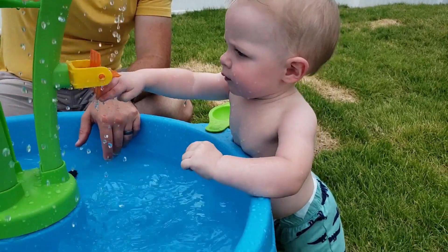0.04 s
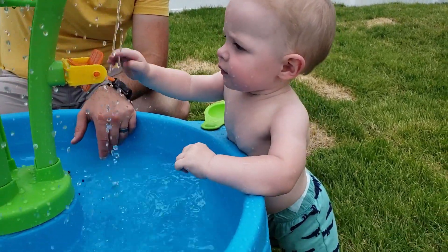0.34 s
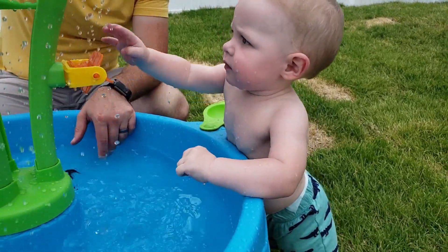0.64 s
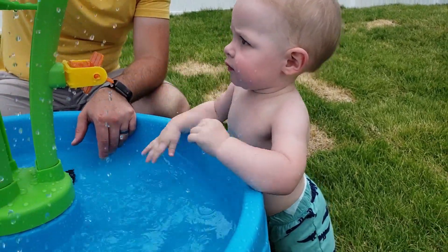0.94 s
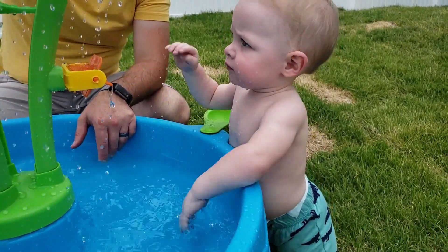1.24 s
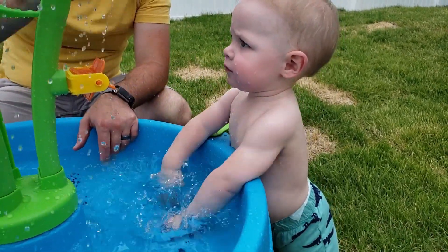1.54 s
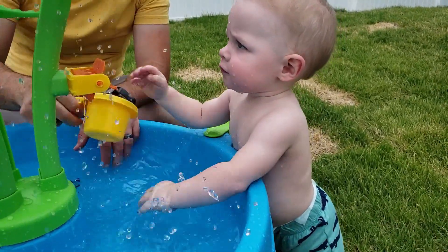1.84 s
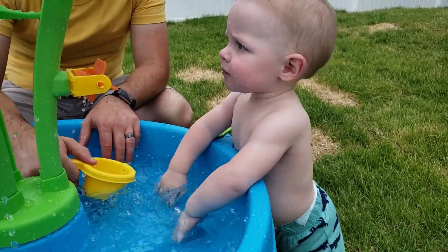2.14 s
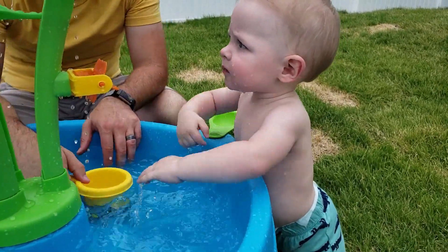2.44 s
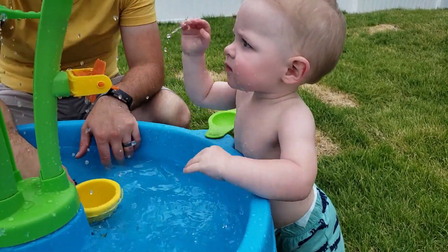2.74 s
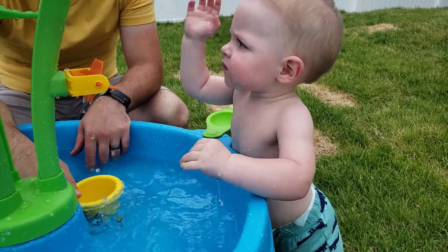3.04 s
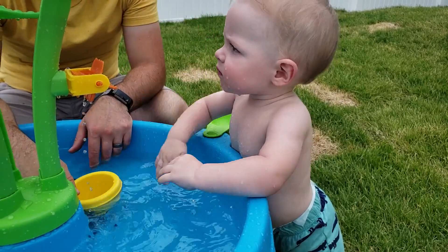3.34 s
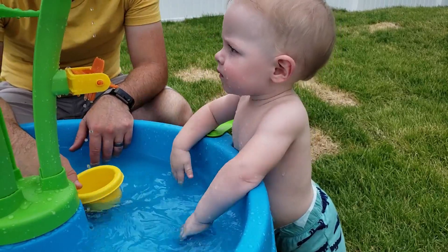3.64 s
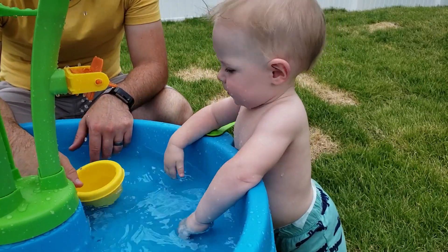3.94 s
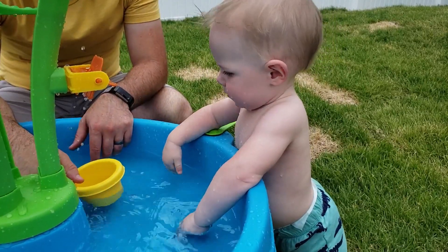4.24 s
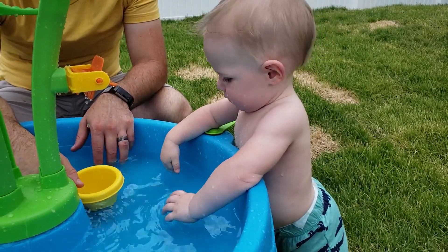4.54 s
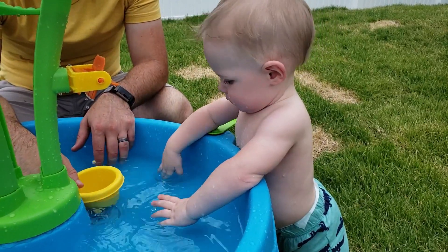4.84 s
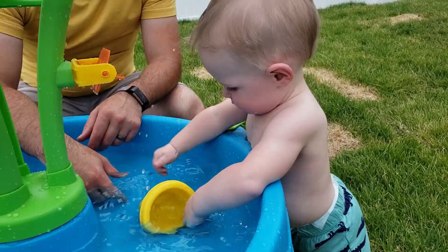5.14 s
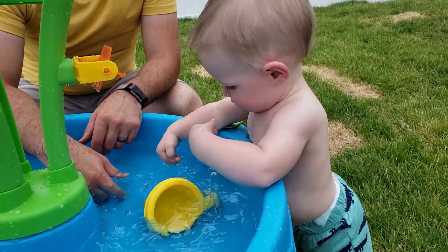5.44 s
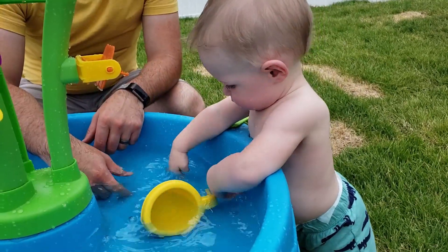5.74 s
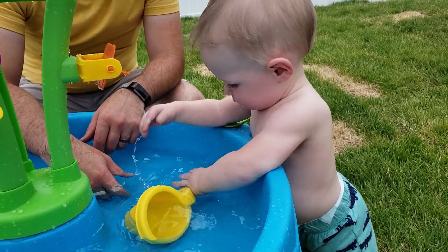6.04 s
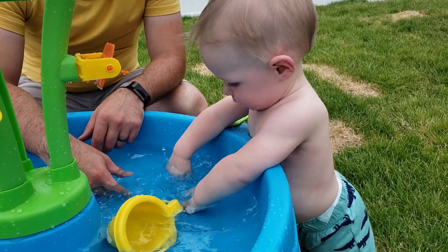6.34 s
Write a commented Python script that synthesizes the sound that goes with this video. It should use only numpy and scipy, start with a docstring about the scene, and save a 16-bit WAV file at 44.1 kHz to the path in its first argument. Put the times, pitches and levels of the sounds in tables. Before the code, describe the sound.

Water trickles and sloshes close by in a plastic play table outdoors as small hands stir and scoop it, with ticking drops and small plinking bubbles. From the start, gusts of wind rumble and thump on the microphone over a faint garden hush. Between about 1.5 and 2.2 seconds come the loudest hand slaps, with spray pattering back and one hard plastic clack at 1.8 seconds. The wind drops away around 2.8 seconds, leaving drips and bubbles, and returns at 3.2, when a very faint, distant whistle, perhaps a bird, is just audible. Another slap lands at 3.5 seconds, followed by a light, hollow knock of a floating cup against the tub. Just after 5 seconds the sound cuts out for an instant and returns with a click. The water then quiets to a few small splashes, with soft cup knocks near 5.3, 5.8 and 6.4 seconds.

```python
"""Small hands slap and scoop the water in a plastic water table outdoors.
Spray patters back, drops tick, and trapped air bubbles ring with a rising plink.
Plastic clacks once and a floating cup knocks on the tub, whose walls add quick echoes.
Gusts of wind buffet the left and right microphones, over a faint garden hush and one far whistle.
Late on, the sound cuts out for a moment and comes back with a click."""
import sys
import numpy as np
from scipy import signal
from scipy.fft import rfft, irfft
from scipy.io import wavfile
from scipy.ndimage import uniform_filter1d

SR = 44100
rng = np.random.default_rng(int(sys.argv[2]) if len(sys.argv) > 2 else 0)


def put_to_file(sound):
    """Save the sound as 16-bit audio at rate SR, in the file named by the first command-line argument."""
    columns = np.atleast_2d(sound).T  # one column per channel
    safe = np.clip(columns, -1, 1)
    whole_steps = np.round(safe * 32767)
    wavfile.write(sys.argv[1], SR, whole_steps.astype(np.int16))


N = 281799
TIME = np.arange(N) / SR


def gain_of(db):
    """Turns decibels into a factor to multiply by."""
    return 10 ** (np.asarray(db) / 20)


def summed(levels_db):
    """The level in dB of several unrelated sounds together."""
    return 10 * np.log10(sum(gain_of(db) ** 2 for db in levels_db))


def evened(x):
    """Scales a sound to an average strength (rms) of 1."""
    return x / np.sqrt(np.mean(x ** 2) + 1e-20)


def steadied(x, seconds):
    """Holds the strength near 1 over spans of this length, leaving faster detail."""
    size = max(int(seconds * SR), 8)
    power = uniform_filter1d(uniform_filter1d((x ** 2).mean(0), size), size)
    return x / np.sqrt(abs(power) + 1e-12)


def at_frequency(points, hz):
    """Looks up values between the rows of a frequency table."""
    row_hz, value = np.transpose(points)
    return np.interp(np.log(hz + 1), np.log(row_hz + 1), value)


def curves(rows):
    """Joins the rows of a time table with straight lines, one curve per column."""
    times, *columns = np.transpose(rows)
    return [np.interp(TIME, times, column) for column in columns]


def swell(start, length, attack_s, release_s):
    """A level in dB that rises, holds and falls."""
    ramps = np.minimum((TIME - start) / attack_s, (start + length - TIME) / release_s)
    return 20 * np.log10(np.clip(ramps, 1e-6, 1))


def wander(rate_hz):
    """A smooth random wobble of strength 1; a higher rate wobbles faster."""
    hz = np.fft.rfftfreq(N, 1 / SR)
    return evened(irfft(rfft(rng.standard_normal(N)) * np.exp(-(hz / rate_hz) ** 2), N))


def panned(sound, pan_db):
    """Makes the left side pan_db louder than the right."""
    return sound * gain_of(np.array([[pan_db], [-pan_db]]) / 2)


def add(mix, start, sound):
    """Mixes a sound in at a start time in seconds."""
    part = mix[:, max(round(start * SR), 0):][:, :sound.shape[-1]]
    part += sound[..., :part.shape[1]]


def coloured(x, tone, size=8192):
    """Filters a sound to follow a tone table; white noise keeps its overall strength."""
    log_gain = np.log(gain_of(at_frequency(tone, abs(np.fft.fftfreq(size, 1 / SR)))))
    taps = np.fft.ifft(np.exp(np.conj(signal.hilbert(log_gain)))).real[:size // 2]
    return signal.oaconvolve(x, taps[None] / np.linalg.norm(taps), axes=1)[:, :x.shape[1]]


def ring(hz, ring_s, rise=0., size=6000):
    """A pure note that fades 60 dB in ring_s while its pitch climbs by the fraction rise."""
    age = np.arange(size) / SR / max(ring_s, 1 / 1000)
    turns = np.cumsum(hz * (1 + rise * np.minimum(age, 1))) / SR
    return np.sin(2 * np.pi * turns) * np.exp(-np.log(1000) * age)


def bubble_swarm(per_s, low_hz, high_hz, cycles, spread_db, width_db, scatter, size):
    """Many tiny bubbles ring, each with its own pitch, strength and place in the tub."""
    count = int(per_s * N / SR)
    when, pitch, strength, life, side, path = rng.random((count, 6)).T[:, :, None]
    hz = low_hz * (high_hz / low_hz) ** pitch
    turns = hz * np.arange(size) / SR
    age = turns / (cycles * (.5 + life))
    strength_db = spread_db * np.minimum(-np.log(strength), 4)
    envelope = gain_of(strength_db) * hz * np.exp(-np.log(1000) * age) * (1 - np.exp(-2 * turns))
    phase = 2 * np.pi * turns * (1 + 0.05 * np.minimum(age, 1))  # the pitch climbs as a bubble rises
    samples = ((when * N).astype(int) + np.arange(size)).ravel()
    channels = []
    for sign in 1, -1:  # left, right
        notes = envelope * gain_of(sign * width_db * (side - .5))
        notes *= np.sin(phase + sign * scatter * (path - .5))
        channels.append(np.bincount(samples, notes.ravel(), N)[:N])
    return evened(np.array(channels))


# Trickling and stirring in the tub: (time [s], spray level [dB], slosh level [dB])
STIRRING = [(0.0, -52, -52.5), (0.34, -50, -56), (0.5, -42.5, -50.5), (0.75, -44, -54.5),
            (0.99, -44.5, -49), (1.16, -45, -43), (1.37, -45, -51.5), (1.56, -51.5, -45),
            (1.71, -44, -44.5), (2.26, -42.5, -42.5), (2.6, -47, -48.5), (3.38, -46, -50),
            (3.58, -50.5, -46.5), (4.09, -50, -52), (4.72, -52.5, -58), (5.09, -55.5, -53),
            (5.41, -68, -69), (6.39, -70, -76)]
# Hands scooping the water: (start [s], length [s], spray level [dB], slosh level [dB])
HAND_SCOOPS = [(0.308, 0.14, -46.5, -53), (1.074, 0.16, -66, -70), (1.526, 0.15, -37.5, -43),
               (1.73, 0.061, -34, -45), (2, 0.21, -44, -47), (2.179, .26, -53.5, -45),
               (2.805, 0.114, -49.5, -43.5), (3.436, 0.094, -43, -48), (3.55, 0.12, -45, -52),
               (3.759, 0.082, -46, -54.5), (3.891, 0.12, -47.5, -48), (4.08, 0.084, -54, -51),
               (4.802, 0.082, -67, -52), (5.229, 0.071, -60, -51.5), (6.271, 0.11, -46.5, -58)]
# The bright tone of spray: (frequency [Hz], level [dB])
SPRAY_TONE = [(1200, -16.5), (2400, -9.5), (3100, -6.5), (3700, -5), (4500, -2), (6200, -1), (8200, -8.5),
              (10000, -7), (12000, -3.5), (13500, -9), (16000, -9.5)]
# The lower tone of sloshing: (frequency [Hz], level [dB])
SLOSH_TONE = [(300, -2.5), (650, -5), (950, 4), (1300, -1), (1650, 1), (2000, -4), (2400, 0.5), (3100, -11),
              (5000, -8.5)]


def water():
    """Fine spray and larger, lower bubbles in a soft wash, louder with each stir, scoop and slap."""
    stir_spray_db, stir_slosh_db = curves(STIRRING)
    spray_levels = [stir_spray_db + wander(22.3)]  # spray lands in clusters
    slosh_levels = [stir_slosh_db + 1.16 * wander(16.4)]  # little waves swell and sink
    for start, length, spray_db, slosh_db in HAND_SCOOPS:
        swell_db = swell(start, length, attack_s=0.016, release_s=0.015)
        spray_levels.append(spray_db + swell_db)
        slosh_levels.append(slosh_db + swell_db)
    for falling_db in falling_water_levels():
        spray_levels.append(falling_db)
        slosh_levels.append(falling_db - 3.5)
    hiss = rng.standard_normal(N) + 0.48 * rng.standard_normal((2, N))
    mist = evened(hiss * gain_of(2 * wander(83)))
    droplets = bubble_swarm(per_s=2200, low_hz=2390, high_hz=12940, cycles=21,
                            spread_db=6.5, width_db=4.5, scatter=0.92, size=400)
    froth = bubble_swarm(per_s=1000, low_hz=489, high_hz=3415, cycles=27.3,
                         spread_db=2.5, width_db=5.5, scatter=1.7, size=1000)
    spray = steadied(coloured(droplets + gain_of(-4.5) * mist, SPRAY_TONE), 0.053)
    slosh = steadied(coloured(froth + gain_of(-2) * mist, SLOSH_TONE), 0.04)
    return gain_of(summed(spray_levels) - 0.78) * spray + gain_of(summed(slosh_levels)) * slosh


# How far the left microphone is ahead for sound from one side: (frequency [Hz], lead [radians])
LEFT_LEAD = [(200, 0.23), (700, 1.03), (1200, 2.4), (1600, 3.1), (2250, 5.36), (2850, 7.5), (4200, 7.8),
             (4600, 6.8), (8000, 5.9)]


def tub(sound, echo_db, off_centre, echo_s=0.035, heave_hz=1.3, size=3000):
    """Sound reaches the microphones directly and off the tub walls; echoes shift as the water heaves."""
    t = np.arange(size) / SR
    heave = 2 * np.pi * heave_hz * TIME
    echoes = np.zeros((2, N))
    for weight in np.cos(heave), np.sin(heave):
        bounces = rng.standard_normal((2, size)) * (t > .001) * gain_of(-60 * t / echo_s)
        echoes += signal.oaconvolve(sound * weight, bounces / np.linalg.norm(bounces[0]), axes=1)[:, :N]
    lead = off_centre * at_frequency(LEFT_LEAD, np.fft.rfftfreq(N, 1 / SR))
    direct = irfft(rfft(sound) * np.exp(.5j * np.array([lead, -lead])), N)
    return panned(direct + gain_of(echo_db) * echoes, 1.6)


# The tone of the quiet garden: (frequency [Hz], level [dB])
GARDEN_TONE = [(30, -8.5), (150, -6), (400, -4), (650, -24), (900, -6), (1300, -18), (1750, -19),
               (3200, -41), (5500, -25), (9000, -27), (16000, -27)]


def garden_hush():
    """The faint steady hush of the garden."""
    return gain_of(-56.5) * evened(coloured(rng.standard_normal((2, N)), GARDEN_TONE))


def turbulence(tone, lump_hz, shared, steady_s, lump_db=4):
    """Swirling air makes lumpy noise, partly shared by the two microphones."""
    own, common = rng.standard_normal((2, N)), rng.standard_normal(N)
    lumps = gain_of(lump_db * (wander(lump_hz) + np.array([wander(lump_hz), wander(lump_hz)])))
    noise = np.sqrt(1 - shared) * own + np.sqrt(shared) * common
    return steadied(coloured(noise * lumps, tone), steady_s)


# The breeze between gusts: (time [s], rumble level [dB])
BREEZE_LEVELS = [(0, -29.5), (.27, -36), (.6, -30.5), (1.3, -33), (2.05, -31), (2.55, -34.5), (2.88, -64.5),
                 (3.11, -61), (3.2, -45), (3.55, -38.5), (3.8, -41.5), (4.05, -35), (4.4, -35.5),
                 (4.95, -29), (5.5, -45.5), (5.85, -28), (6.27, -56.5), (6.39, -40)]
# Gusts on the microphones: (start [s], length [s], rumble level [dB], flutter level [dB])
WIND_GUSTS = [(0.105, 0.069, -28.5, -38.5), (0.317, 0.22, -28, -31.5), (0.479, 0.14, -23, -25.5),
              (0.654, 0.13, -28.5, -30.5), (0.784, 0.076, -35, -26), (0.927, .11, -25, -36),
              (1.043, 0.18, -25.5, -27), (1.348, 0.068, -22.5, -28), (1.409, 0.13, -28.5, -28),
              (1.658, 0.31, -27.5, -39), (2.103, 0.12, -28, -32.5), (2.286, 0.083, -33, -28.5),
              (2.399, .2, -32, -38), (3.287, 0.12, -33.5, -32), (3.896, 0.099, -29, -33.5),
              (4.067, .11, -27, -33.5), (4.55, 0.258, -28.5, -34.5), (4.837, 0.22, -37, -30),
              (5.098, 0.258, -28.5, -40.5), (5.593, 0.13, -32, -42.5), (5.712, 0.095, -28.5, -33.5),
              (6.112, 0.12, -35.5, -71)]
# The wind's deep rumble: (frequency [Hz], level [dB])
RUMBLE_TONE = [(12, -9), (28, -7), (50, -1), (75, 1.5), (130, -3.5), (220, -11), (400, -28), (900, -55.5),
               (2500, -61)]
# Its higher flutter: (frequency [Hz], level [dB])
FLUTTER_TONE = [(60, -27.5), (180, -2.5), (300, 1.5), (450, -5), (700, -18), (1100, -36.5), (2000, -47.5),
                (5000, -58)]
# Its crackle, higher still: (frequency [Hz], level [dB])
CRACKLE_TONE = [(200, -16.5), (550, 7), (850, 2.5), (1300, -8), (2200, -27), (5000, -35)]


def wind():
    """A low rumble; stronger gusts shed smaller swirls that flutter, and the strongest crackle."""
    breeze_db = curves(BREEZE_LEVELS)[0] + 0.5 * wander(18)
    ragged_db = 2 * wander(28.2)  # a gust comes as a string of thumps
    rumble_levels = [breeze_db]
    flutter_levels = [breeze_db - 12 - 0.18 * (breeze_db - breeze_db.mean())]  # softer and steadier
    for start, length, gust_rumble_db, gust_flutter_db in WIND_GUSTS:
        swell_db = swell(start, length, attack_s=0.017, release_s=0.031)
        rumble_levels.append(gust_rumble_db + swell_db)
        flutter_levels.append(gust_flutter_db + swell_db)
    flutter_db = summed(flutter_levels) + ragged_db
    rumble = turbulence(RUMBLE_TONE, lump_hz=34.8, shared=0.13, steady_s=0.046)
    flutter = turbulence(FLUTTER_TONE, lump_hz=79.5, shared=0.11, steady_s=0.053)
    crackle = turbulence(CRACKLE_TONE, lump_hz=120, shared=0.1, steady_s=0.05)
    return (gain_of(summed(rumble_levels) + 4) * rumble
            + gain_of(flutter_db + 1.5) * flutter
            + gain_of(1.425 * flutter_db - 8.5) * crackle)


def strays(level_db, per_s, low_hz, high_hz, spread_db=7.5, width_db=9.5):
    """Random events along a level curve: (time [s], level [dB], pitch [Hz], left over right [dB])."""
    when, strength, pitch, side = rng.random((int(per_s * N / SR), 4)).T
    times = when * N / SR
    db = np.interp(times, TIME, level_db) + spread_db * (strength - .5)
    hz = low_hz * (high_hz / low_hz) ** pitch
    return list(zip(times, db, hz, width_db * (side - .5)))


# The largest drops landing: (time [s], level [dB], pitch [Hz], left over right [dB])
BIG_DROPS = [(0.03, -22, 4770, 0.5), (0.116, -25, 5070, 1.5), (0.5576, -23.5, 4130, -1),
             (0.85, -20, 4200, -1), (1.266, -23, 5930, -3), (1.367, -29.5, 6000, 0),
             (2.0607, -15, 5430, -2), (2.782, -23, 4640, 2), (2.9116, -24, 4800, -2),
             (2.949, -23, 5950, -1), (3.0963, -25.5, 4200, 2), (3.175, -26, 5900, 2),
             (3.2625, -23.5, 7700, 4), (3.5926, -21.5, 3470, -2), (3.6493, -24, 4050, 1),
             (3.847, -24, 6370, 1), (3.9395, -30, 6150, -3), (4.132, -22, 5150, 0), (4.3093, -28, 7260, 3),
             (4.387, -21.5, 5200, 0), (4.7376, -26, 6750, 1), (5.786, -30, 4940, -2)]


def drops():
    """A drop ticks on the surface and rings a tiny bubble; smaller drops fall at random."""
    out, t = np.zeros((2, N)), np.arange(1500) / SR
    spray_db, _ = curves(STIRRING)
    small_drops = strays(spray_db + 14, per_s=7, low_hz=3720, high_hz=7650)
    for start, db, hz, pan_db in BIG_DROPS + small_drops:
        tick = coloured(rng.standard_normal((1, len(t))) * np.exp(-t / 0.0031), SPRAY_TONE)[0]
        plink = ring(hz, ring_s=0.013, rise=0.092, size=len(t))
        add(out, start, panned(gain_of(db - 10) * tick + gain_of(db - 6) * plink, pan_db))
    return out


# Strong swirls of air hitting a microphone: (time [s], level [dB], pitch [Hz], left over right [dB])
AIR_SWIRLS = [(0.351, -13, 191, 6), (0.569, -10.5, 187, 7), (0.584, -14, 51.3, -3), (0.699, -13.5, 129, 0),
              (0.804, -13.5, 167, 1), (1.06, -14.5, 163, 0), (1.094, -10, 347, 0), (1.154, -12, 300, 6),
              (1.364, -6.5, 96, 3), (1.476, -11.5, 218, 3.5), (1.9, -11, 78.5, -1.5), (2.292, -18, 230, -3),
              (3.314, -15.5, 112, 7), (3.36, -12, 71.5, -2), (3.669, -22, 74, 12), (4.239, -19.5, 182, 4.5),
              (4.384, -23, 92, 1), (4.627, -13.5, 157, 9), (4.694, -11, 61, 8), (4.777, -15.5, 59.7, 4),
              (4.884, -9.5, 330, 3), (4.968, -15, 130, -2), (5.014, -9, 274, -5), (5.101, -9.5, 61.4, -2),
              (5.132, -17.5, 353, -8.5), (5.149, -9, 63, 4.5), (5.215, -9.5, 160.5, -0.5),
              (5.326, -13, 56.5, 0.5)]


def wind_thumps():
    """Each swirl is one swing of pressure, reaching each side at its own moment, plus a puff."""
    out, t = np.zeros((2, N)), np.arange(3000) / SR
    delays = rng.uniform(0, 0.002, (len(AIR_SWIRLS), 2))
    for (start, db, hz, pan_db), delay in zip(AIR_SWIRLS, delays):
        turns = hz * np.maximum(t - delay[:, None], 0)
        swing = np.sin(2 * np.pi * turns) * turns * np.exp(-(turns / 0.79) ** 2)
        quick_db = 3.5 * np.log2(hz / 160)  # small, quick swirls break into a stronger puff
        burst = rng.standard_normal((2, len(t))) * t * np.exp(-t / 0.003)
        crackle = gain_of(quick_db - 6) * coloured(burst[::-1], CRACKLE_TONE)
        puff = coloured(burst, FLUTTER_TONE) + crackle
        thump = gain_of(db - 1.5) * swing / abs(swing).max()
        thump += gain_of(db - 7 + quick_db) * puff / abs(puff).max()
        add(out, start, panned(thump, pan_db))
    return out


# The largest trapped bubbles: (time [s], level [dB], rough pitch [Hz])
BIG_BUBBLES = [(0.373, -32.5, 1610), (0.971, -30, 1046), (1.129, -33.5, 3350), (1.203, -30, 1110),
               (1.296, -23, 1030), (1.63, -29, 854), (1.946, -24, 2460), (2.031, -29, 940),
               (2.132, -37, 1040), (2.201, -26, 1120), (2.237, -28, 2440), (2.801, -29.5, 786),
               (2.816, -36, 395), (2.879, -33.5, 2030), (2.896, -39, 677), (3.048, -28.5, 2395),
               (3.49, -24, 2290), (3.709, -33, 990), (3.791, -32, 2300), (3.965, -27, 2400),
               (4.099, -33, 990), (4.236, -35.5, 1020), (4.434, -36, 2480), (4.506, -33.5, 2520),
               (4.558, -35, 2250), (4.812, -36, 2490), (6.039, -43, 2340)]


def bubbles():
    """A drop punches in with a splat; the trapped air rings, rising in pitch as it nears the surface."""
    out, t = np.zeros((2, N)), np.arange(6000) / SR
    _, slosh_db = curves(STIRRING)
    small_bubbles = strays(slosh_db + 11, per_s=9, low_hz=825, high_hz=2730)
    centred_bubbles = [(*row, 0) for row in BIG_BUBBLES]
    for start, db, hz, pan_db in centred_bubbles + small_bubbles:
        plop = ring(hz * .97, ring_s=47 / hz, rise=0.25)  # large, low bubbles ring longer
        plop *= 1 - np.exp(-t / 0.00026)
        splat = coloured(rng.standard_normal((1, len(t))) * np.exp(-t / 0.00073), SLOSH_TONE)[0]
        add(out, start, panned(gain_of(db + 3) * (plop + .3 * splat), pan_db))
    return out


# Hands slapping the water: (time [s], level [dB], brightness [dB per octave])
HAND_SLAPS = [(1.5508, -10, -0.5), (1.6087, -2, 1), (1.6631, -24, -8), (1.733, -17.5, -2), (1.7503, -7, 1),
              (2.1025, -5, 2), (2.1254, -6, -3), (2.2339, -17.5, -4), (3.474, -12, 2), (4.8063, -24, -4),
              (5.256, -18.5, -3.5), (5.307, -25, -4), (5.7555, -20.5, 4), (6.2892, -28, 0)]


def slaps(fade_s=0.054):
    """A palm bursts the surface: a crackling sheet of spray over a lower splat, both dying quickly."""
    out, t = np.zeros((2, N)), np.arange(8000) / SR
    for start, db, brightness in HAND_SLAPS:
        noise = rng.standard_normal(len(t)) + .5 * rng.standard_normal((2, len(t)))
        clumps = gain_of(3 * evened(uniform_filter1d(rng.standard_normal(len(t)), 50)))
        envelope = gain_of(db - 13 - 60 * t / fade_s) * (1 - np.exp(-t / 0.00096))
        burst = envelope * steadied(clumps * noise, 0.0015)
        sheet_tone = [(hz, level + brightness * np.log2(hz)) for hz, level in SPRAY_TONE]
        splat = gain_of(0.1 * db - 17) * coloured(burst, SLOSH_TONE)
        add(out, start, coloured(burst, sheet_tone) + splat)
    return out


def falling_water_levels(fade_s=0.29):
    """The water thrown up by a slap falls back: one fading curve in dB for each slap."""
    return [np.where(TIME > start, db - 28 - 60 * (TIME - start) / fade_s, -np.inf)
            for start, db, _ in HAND_SLAPS]


# The notes that ring together in dry plastic: (pitch [Hz], level [dB], ring time [s])
CLACK_NOTES = [(1776, -9, 0.014), (2400, -4.5, 0.034), (2770, -10, 0.019), (3300, -6, 0.026),
               (4720, -17, 0.015), (5640, -6.5, 0.0077), (6120, -5.5, 0.015), (7370, -7.5, 0.013)]


def plastic_clack(start=1.757, level_db=-5.5):
    """One hard hit on dry plastic: short, high notes and a burst of contact noise."""
    out, t = np.zeros((2, N)), np.arange(6000) / SR
    notes = sum(gain_of(db) * ring(hz, ring_s) * (-1) ** k  # every other note starts downward
                for k, (hz, db, ring_s) in enumerate(CLACK_NOTES))
    contact = rng.standard_normal(len(t)) * np.exp(-t / 0.008)
    add(out, start, gain_of(level_db) * (notes + gain_of(-8) * contact))
    return out


# A thin, far whistle, perhaps a bird: (time [s], pitch [Hz], level [dB])
WHISTLE_SHAPE = [(3.314, 5250, -55), (3.36, 5740, -53), (3.42, 5530, -65), (3.46, 5400, -54)]


def whistle():
    """One faint, quavering note rises and falls across the garden."""
    times, pitches, levels = np.transpose(WHISTLE_SHAPE)
    t = np.arange(times[0], times[-1], 1 / SR)
    hz = np.interp(t, times, pitches) * (1 + 0.013 * wander(200)[:len(t)])
    envelope = gain_of(np.interp(t, times, levels) + 9) * signal.windows.tukey(len(t), .5)
    out = np.zeros((2, N))
    add(out, times[0], envelope * np.sin(2 * np.pi * np.cumsum(hz) / SR))
    return out


# The cup hitting the tub:
# (time [s], level [dB], lowest pitch [Hz], brightness [dB per octave], ring time stretch [factor])
CUP_KNOCKS = [(3.584, -24.5, 776, 4.5, 0.83), (5.263, -31, 758, 3, 0.71), (5.762, -23, 875, -34.5, 1.16),
              (6.362, -22, 856, -16, 0.55), (6.373, -25, 708, 2.5, 1)]
# The notes that ring together in the cup: (pitch [times the lowest], level [dB], ring time [s])
CUP_NOTES = [(1, 2, .046), (1.169, -4, 0.031), (1.9, 1.5, 0.026), (2.2, -11, 0.056), (2.8, -17, 0.014),
             (4.7, -10.5, 0.012), (6.3, -25.5, 0.069)]


def cup_knocks():
    """The floating cup knocks on the tub with a hollow ring and a wet splat."""
    out, t = np.zeros((2, N)), np.arange(6000) / SR
    attack = 1 - np.exp(-t / 0.00053)
    for start, db, hz, brightness, stretch in CUP_KNOCKS:
        knock = sum(gain_of(note_db + brightness * np.log2(ratio)) * ring(hz * ratio, ring_s * stretch)
                    for ratio, note_db, ring_s in CUP_NOTES)
        splat = coloured(rng.standard_normal((2, len(t))) * np.exp(-t / 0.0076), SLOSH_TONE)
        add(out, start, gain_of(db + 1) * (knock + gain_of(-15) * splat) * attack)
    return out


def scene():
    """Water splashing off to one side and the plastic straight ahead, under the wind."""
    stirred = tub(water() + drops() + bubbles(), echo_db=-1.5, off_centre=1)
    slapped = tub(slaps(), echo_db=-2.5, off_centre=1)
    toys = tub(cup_knocks() + plastic_clack(), echo_db=-2.5, off_centre=0)
    return stirred + slapped + toys + wind() + wind_thumps() + garden_hush() + whistle()


# Everything cuts out for a moment: (time [s], level [dB])
BRIEF_SILENCE = [(5.024, 0), (5.031, -20), (5.05, -28), (5.057, -70), (5.093, -70), (5.096, 0)]


def record(dry, click_at_s=5.096, click_db=-30, highest_hz=15900):
    """The sound drops out and clicks back; the loudest peaks and the highest treble are cut off."""
    heard = np.clip(dry * gain_of(curves(BRIEF_SILENCE)[0]), -1, 1)
    add(heard, click_at_s, gain_of(click_db) * np.exp(-np.arange(400) / 60))
    treble_cut = signal.firwin(401, highest_hz, window=("kaiser", 9), fs=SR)
    return signal.oaconvolve(heard, treble_cut[None], "same")


dry = scene()
out = record(dry)
put_to_file(out)
```